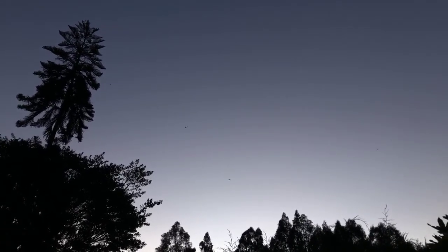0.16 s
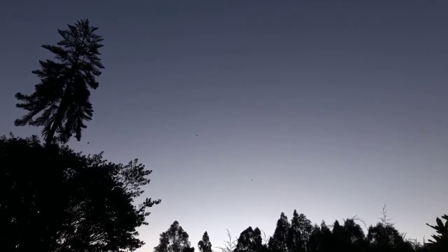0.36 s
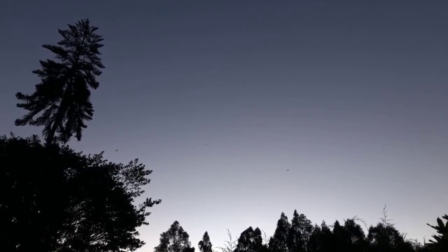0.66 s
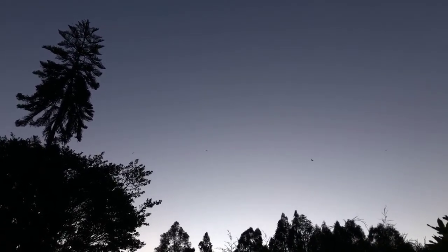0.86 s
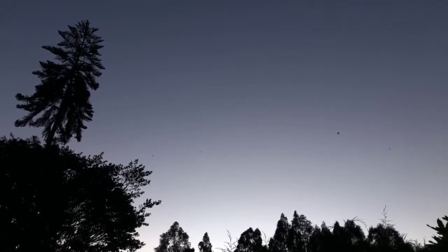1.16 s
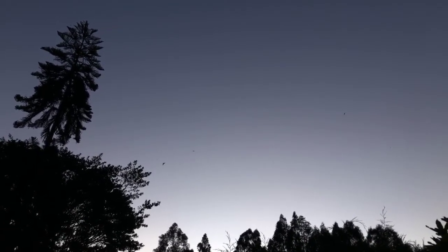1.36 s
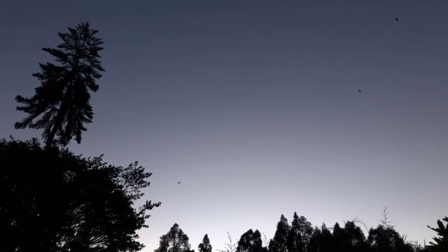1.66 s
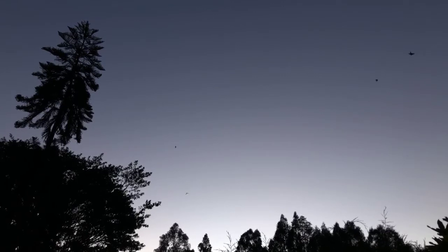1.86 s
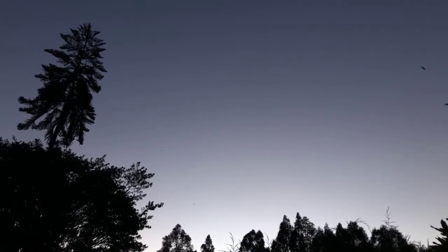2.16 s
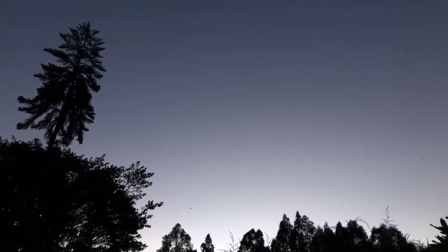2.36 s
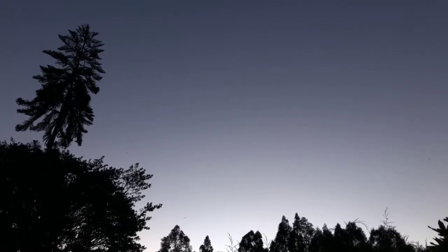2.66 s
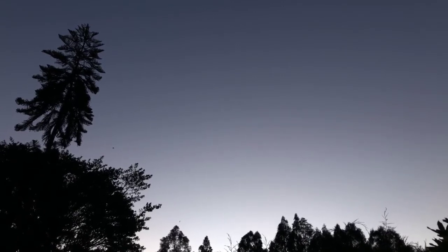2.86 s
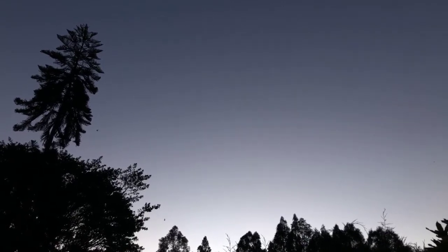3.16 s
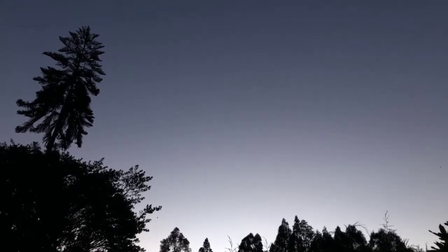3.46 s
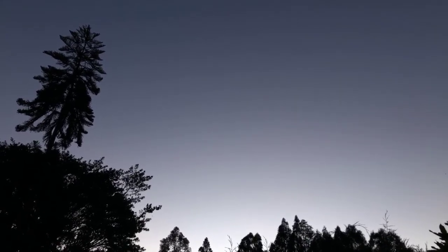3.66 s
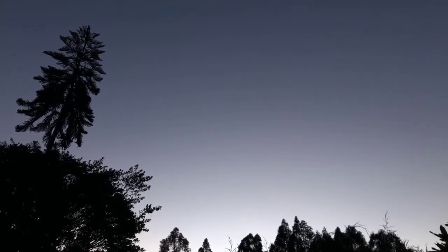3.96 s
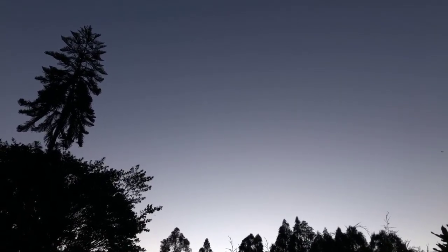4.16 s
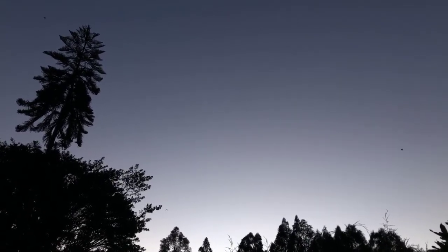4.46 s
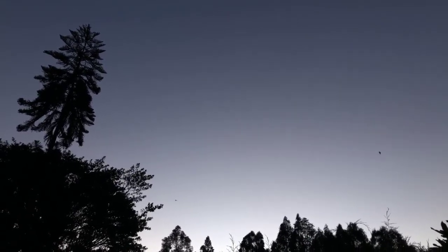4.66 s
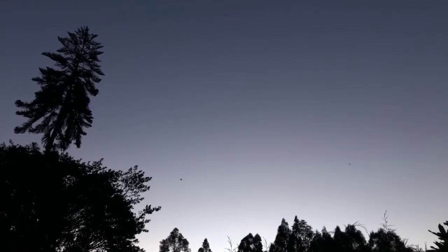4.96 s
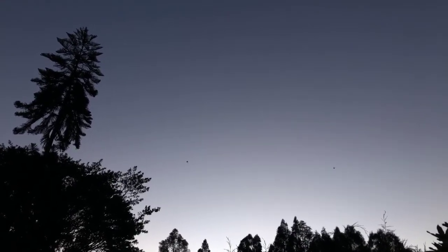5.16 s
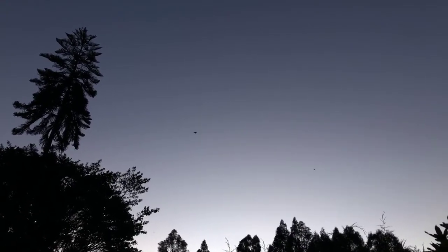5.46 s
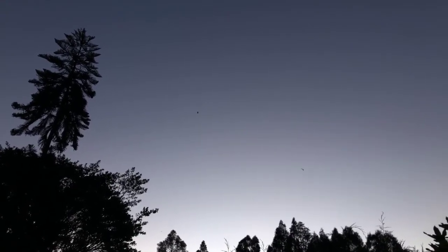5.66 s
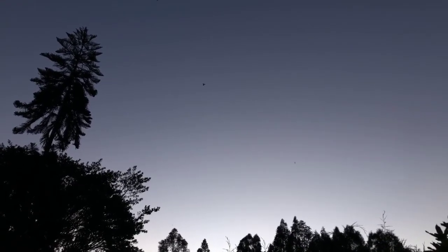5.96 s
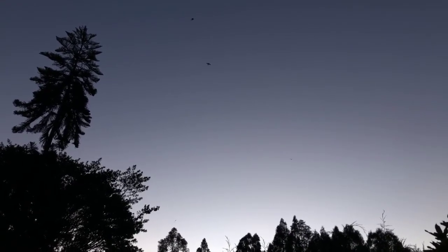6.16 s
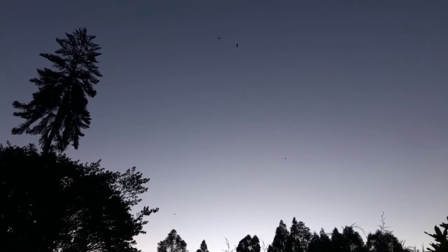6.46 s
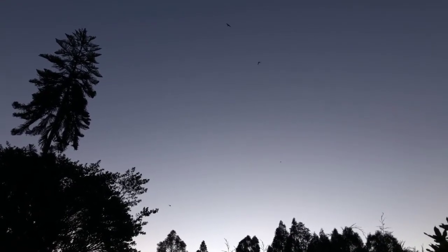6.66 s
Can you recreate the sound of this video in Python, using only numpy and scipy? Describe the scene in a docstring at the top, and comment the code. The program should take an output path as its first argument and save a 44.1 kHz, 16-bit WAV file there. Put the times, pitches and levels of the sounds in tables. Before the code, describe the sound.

A quiet outdoor dusk with a soft, deep rumble like distant traffic, gently swelling around 2 s and continuing throughout. From 0 to 1 s, two faint falling swallow chirps, low double pips, a short far buzzing trill and thin contact calls appear. A slightly clearer thin call comes near 1.2 s, then weak drawn-out chirps and small dry ticks between 1.5 and 2 s. From 2.4 to 3.5 s, hoarse little nasal calls repeat far off among thin peeps. Gliding whistles around 4 to 6 kHz gather from 3.5 s. At 4.4 to 5.75 s comes the bright peak: high squeaks, a strong sinking whistle and rapid downward chirps over distant twitter, with brief hiss and tiny clicks. After 6 s only faint whistles remain, the last sinking near 6.6 s. Very distant hoots recur; trees and ground softly reflect the calls.

```python
"""Swallows overhead at dusk, over a low distant rumble of filtered noise with a high hiss that comes and goes.
First come faint swept-sine chirps, far pips, a buzzing trill of resonant noise and dry noise-burst ticks;
then hoarse nasal calls, gliding whistles and a dense run of falling chirps amid a far twitter.
Late on, more faint whistles follow. Hoots and tiny clicks recur; ground and trees throw the calls back."""
import sys
import numpy as np
from scipy import signal
from scipy.fft import rfft, irfft
from scipy.io import wavfile
from scipy.ndimage import uniform_filter1d

SR = 44100
rng = np.random.default_rng(int(sys.argv[2]) if len(sys.argv) > 2 else 0)


def persist_wave(psi):
    """Save psi, clipped to +-1, as 16-bit WAV."""
    counts = np.round(np.clip(psi, -1, 1) * 32767).astype(np.int16)
    wavfile.write(sys.argv[1], SR, np.atleast_2d(counts).T)


N = 300762
TIME = np.arange(N) / SR

# Note shapes give level_db relative to the level of each event; spectra give relative level_db.
# spectrum of the air and rumble: frequency_hz, level_db
AIR_SPECTRUM = [(22, -23.5), (42, 0.7), (70, -4), (120, -8), (200, -18.5), (330, -26), (580, -30.5),
                (920, -29), (1500, -35.5), (2400, -40), (3100, -40), (4200, -43.5), (6500, -51),
                (15500, -60)]
# swell of the rumble: time_s, change_db
RUMBLE_SWELL = [(0, 0.5), (.8, 0), (1.2, -1), (2.2, 2), (4.6, -1.5), (5.2, 0), (6.82, 1.5)]
# strength of a faint rustle: time_s, level_db
RUSTLE_LEVEL = [(0, -69.5), (1.0, -71.5), (1.8, -65), (2.2, -73.5), (3.2, -77), (5.9, -76), (6.82, -100)]
# spectrum of the rustle: frequency_hz, level_db
RUSTLE_SPECTRUM = [(300, -17), (900, 6.5), (2000, 3), (3000, 1.5), (4200, 0), (6000, -9.5), (9000, -31.5)]
# bell-shaped swells of a high hiss: centre_s, level_db, half_length_s
HISS_SWELLS = [(1.3, -78, .09), (1.7, -80, 0.16), (4.47, -61.5, 0.097), (4.7, -67.5, .09),
               (5.45, -76, 0.21), (6.52, -71.5, 0.11)]
# spectrum of the hiss: frequency_hz, level_db
HISS_SPECTRUM = [(500, -20), (1800, 1.5), (4000, -0.5), (7000, -6.5), (10000, -5), (12500, -9),
                 (15500, -22)]
# spectrum scattered back by the trees: frequency_hz, level_db
TREE_SPECTRUM = [(1000, -8), (2200, 0), (2900, 5.5), (4300, -4), (5200, 3.5), (6500, 2), (9000, -26.5)]

# strength of the far flock, on top of its chirps: time_s, level_db
FLOCK_LEVEL = [(0, -73), (3.2, -76), (4.25, -80), (4.5, -68), (4.9, -65), (5.5, -68), (6.1, -85),
               (6.82, -88)]
# very distant hoots, smeared by the trees: centre_s, level_db, half_length_s
HOOT_SWELLS = [(.62, -71, .08), (1.83, -74, 0.047), (2.8, -74.5, 0.054), (3.95, -67.5, .12),
               (4.71, -70.5, 0.087), (5.78, -70.5, 0.086)]
# a far buzzing trill that swells and breaks off: time_s, level_db
BUZZ_LEVEL = [(.49, -110), (.53, -77.5), (.77, -66), (.88, -76), (.92, -110)]
# resonances of the trill: frequency_hz, width_hz, level_db
BUZZ_RESONANCES = [(3200, 2400, -2), (5560, 600, -3)]
# shape of a far nasal call: time_s, pitch_hz, level_db
NASAL_SHAPE = [(0, 1043, -8), (.012, 1069, -1.5), (.03, 1010, -1.5), (.046, 922, -9)]
# nasal calls: start_s, level_db
NASAL_CALLS = [(2.4, -72.5), (2.68, -66), (2.957, -69), (3.248, -67), (3.509, -66.5)]
# shape of a far bird's low pip: time_s, pitch_hz, level_db
PIP_SHAPE = [(0, 2080, 3), (.01, 1990, 1), (.026, 1780, 0)]
# pairs of pips: start_s, first_level_db
PIP_PAIRS = [(0.278, -68), (.513, -65.5), (0.739, -68)]
PIP_GAP_S, SECOND_PIP_DB = 0.033, -3
# shape of a short thin contact call: time_s, pitch_hz, level_db
CONTACT_SHAPE = [(0, 6650, -3), (.008, 5900, 1), (.017, 4990, -6.5), (.022, 4400, -24), (.036, 3850, -3)]
# contact calls: start_s, level_db, time_stretch (ratio)
CONTACT_CALLS = [(.702, -73, 1.0), (.86, -67, 1.3), (1.182, -61, 1.2), (2.558, -72, 1.0), (2.74, -76, 1.0),
                 (2.828, -67, .8), (2.92, -78, 1.0), (3.047, -70.5, 1.1), (3.1, -73, 1.0), (3.227, -71, .7)]

# tiny sharp clicks: time_s, level_db (peak of the impulse before its filter)
CLICK_EVENTS = [(1.008, -55), (1.035, -53), (2.405, -48), (2.754, -49), (4.482, -36), (5.052, -45),
                (5.225, -50), (5.518, -43), (5.99, -52)]
# small dry ticks: start_s, level_db
TICK_EVENTS = [(1.489, -49), (1.496, -49.5), (1.679, -53), (1.71, -56), (1.728, -65), (2.011, -53),
               (2.018, -56)]
# spectrum of a tick: frequency_hz, level_db
TICK_SPECTRUM = [(300, -27), (1000, 2), (1800, 0.5), (2600, -8), (3800, -3), (6000, -24), (14000, -36)]

# gliding whistles: start_s, rise_s, fall_s, crest_hz, climb_octaves_per_s, sink_octaves_per_s,
# slip_after_crest_s, slip_octaves, loudest_at (share of the length), level_db
GLIDING_WHISTLES = [(0.51, 0.014, 0.236, 4636.0, 0.0, 0.14, 0.0, 0.0, 0.45, -71.7),
                    (0.53, 0.176, 0.074, 4100.0, 0.5, 1.2, 0.0, 0.0, 0.3, -71.0),
                    (0.92, 0.052, 0.448, 4995.0, 2.0, 2.0, 0.062, 0.09, 0.3, -68.5),
                    (2.08, 0.013, 0.237, 4544.0, 0.0, 2.29, 0.0, 0.0, 0.9, -74.7),
                    (3.505, 0.12, 0.01, 4296.0, 0.5, 0.5, 0.0, 0.0, 0.9, -60.5),
                    (3.555, 0.027, 0.04, 5130.0, 2.2, 4.0, 0.017, 0.26, 0.6, -60.0),
                    (3.73, 0.145, 0.045, 4813.0, 0.3, 0.8, 0.0, 0.0, 0.65, -57.2),
                    (3.91, 0.05, 0.325, 4375.0, 0.0, 1.62, 0.0, 0.0, 0.65, -56.0),
                    (3.77, 0.095, 0.36, 4663.0, 0.4, 2.87, 0.0, 0.0, 0.12, -66.5),
                    (3.973, 0.026, 0.026, 5060.0, 5.2, 1.01, 0.0, 0.0, 0.55, -63.7),
                    (3.976, 0.007, 0.607, 6240.0, 0.0, 1.94, 0.118, 0.13, 0.55, -53.5),
                    (4.055, 0.005, 0.07, 4432.0, 0.0, 1.94, 0.0, 0.0, 0.7, -51.1),
                    (4.16, 0.04, 0.075, 5191.0, 4.1, 2.55, 0.0, 0.0, 0.35, -56.9),
                    (4.22, 0.025, 0.125, 6602.0, 8.0, 0.34, 0.0, 0.0, 0.1, -71.9),
                    (4.447, 0.034, 0.411, 5319.0, 5.1, 1.77, 0.018, 0.17, 0.55, -46.3),
                    (4.845, 0.011, 0.184, 3563.0, 0.0, 2.54, 0.0, 0.0, 0.9, -57.4),
                    (6.075, 0.125, 0.05, 4244.0, 0.7, 0.79, 0.0, 0.0, 0.6, -67.8),
                    (6.33, 0.085, 0.125, 4620, 0.4, 0.6, 0, 0, 0.28, -68),
                    (6.535, 0.005, 0.31, 4450, 0, 1.58, 0, 0, 0.78, -60)]
CREST_S, SLIP_S = 0.03, 0.011  # how long the pitch takes to turn over, and to slip down
WHISTLE_ONSET_DB, WHISTLE_PEAK_DB, WHISTLE_END_DB = -9, 0.5, -7  # relative to the level of its row
# shape of the high squeak that opens a series: time_s, pitch_hz, level_db
SQUEAK_SHAPE = [(-.03, 8200, -19), (-.016, 8060, -8), (0, 8240, -5.5), (.009, 7750, -2), (.016, 7050, -7)]
# squeaks: time_s, level_db
SQUEAK_EVENTS = [(4.414, -52.5), (4.655, -58)]
# shape of another bird's soft slur, just ahead of full chirps: time_s, pitch_hz, level_db
SLUR_SHAPE = [(-.026, 6500, -6), (-.012, 5000, -18), (0, 4100, 0), (.018, 3500, -7), (.034, 2960, -3),
              (.054, 2520, -2)]
# slurs: time_s, level_db, time_stretch (ratio)
SLUR_EVENTS = [(5.361, -59, 0.73), (5.515, -59.5, 1.11), (5.707, -59, 0.95)]
# shape of a steep chirp with a U-shaped opening hook: time_from_knee_s, pitch_hz, level_db
STEEP_SHAPE = [(-.0165, 7500, -15), (-.012, 5950, 1), (-.0075, 7500, -16), (-.0055, 4950, -1),
               (-.002, 5280, 5), (.004, 4450, -9), (.023, 3720, 6), (.032, 3200, -3), (.05, 2520, -4),
               (.067, 2080, -17)]
# steep chirps: knee_s, level_db, time_stretch (ratio)
STEEP_CHIRPS = [(4.389, -61, 1.14), (4.672, -52, 1.17), (4.825, -50.5, 1.11), (4.983, -51.5, 1.07),
                (5.136, -53, 1.11)]
# shape of a full chirp: time_from_knee_s, pitch_hz, level_db
FULL_SHAPE = [(-.019, 7500, -27), (-.011, 6150, -14), (-.002, 4900, -14), (.005, 4560, -1),
              (.019, 4150, -2), (.029, 3800, 3.5), (.046, 3230, -1), (.066, 2720, -9), (.084, 2480, -21)]
# full chirps: knee_s, level_db, time_stretch (ratio)
FULL_CHIRPS = [(0.062, -58.5, 1.06), (.2, -84, .9), (.251, -59, 0.98), (.38, -81, 1.1), (.825, -73, .9),
               (1.418, -79, 1.2), (1.553, -67.5, 1.47), (1.77, -69, 1.7), (1.987, -68.5, 1.47),
               (4.447, -51.5, 1.16), (4.686, -50.5, 1.1), (5.008, -47, 1.23), (5.195, -44.5, 1.11),
               (5.298, -62.5, 0.84), (5.374, -45.5, 0.94), (5.546, -47.5, 1.05), (5.727, -52, 1),
               (5.87, -84, 0.94)]

DISTANT_BELOW_DB, DULLING_DB_PER_OCTAVE = -59, 1.95  # fainter calls lose treble, so much for each dB


def from_db(db):
    """Amplitude ratio: 20 dB make a factor of ten."""
    return 10 ** (np.asarray(db) / 20)


def rms_one(x):
    """Normalisation to unit mean power."""
    return x / np.sqrt(np.mean(x ** 2) + 1e-20)


def level(rows):
    """Amplitude envelope, linear in decibels between (time_s, level_db) rows."""
    return from_db(np.interp(TIME, *np.transpose(rows)))


def swells(rows):
    """Gaussian amplitude envelopes, summed over (centre_s, level_db, half_length_s) rows."""
    return sum(from_db(db) * np.exp(-((TIME - s) / half) ** 2 / 2) for s, db, half in rows)


def coloured(points, size=N):
    """Spectral shaping: white noise weighted along (frequency_hz, level_db) points, rms 1."""
    hz, db = np.transpose(points)
    bins = np.maximum(np.arange(size // 2 + 1) * SR / size, 1)
    gain = from_db(np.interp(np.log(bins), np.log(hz), db))
    below = np.minimum(bins / hz[0], 1) ** 2
    spectrum = rfft(rng.standard_normal(size)) * gain * below
    return rms_one(irfft(spectrum, size))


def narrow(hz, width_hz):
    """Resonance: noise passed twice through one damped resonator is a blurred tone, rms 1."""
    radius = np.exp(-np.pi * width_hz / SR)
    b = [1, 0.0037, -1]
    a = [1, -2 * radius * np.cos(2 * np.pi * hz / SR), radius * radius]
    once = signal.lfilter(b, a, rng.standard_normal(N))
    return rms_one(signal.lfilter(b, a, once))


def drift(t, rate):
    """Random modulation: straight lines between `rate` random values a second."""
    knots = rng.standard_normal(1024)
    return np.interp((t - t[0]) * rate, np.arange(len(knots)), knots)


def add(out, s, sound):
    """Superposition: a sound is summed in from time s on."""
    start = max(int(s * SR), 0)
    out[start:start + len(sound)] += sound[:max(N - start, 0)]


def sing(rows, overtones_db, waver, flutter_db, edge_s=0.0051, far_flutter=0.081, steady_db=-51):
    """Frequency modulation: the syrinx's harmonics follow (time_s, pitch_hz, level_db) rows, unsteadily."""
    s, hz, db = np.transpose(rows)
    t = np.arange(s[0] - edge_s, s[-1] + edge_s, 1 / SR)
    pitch = uniform_filter1d(np.interp(t, s, hz), size=60) * (1 + waver * drift(t, rate=440))
    phase = 2 * np.pi * np.cumsum(pitch) / SR
    from_edge_s = np.minimum(t - t[0], t[-1] - t)
    fade = np.sin(np.pi / 2 * np.clip(from_edge_s / (2 * edge_s), 0, 1)) ** 2
    # faint calls have come a long way through moving air: they twinkle more and are duller
    twinkle_db = far_flutter * max(steady_db - db.max(), 0)
    faintness_db = max(DISTANT_BELOW_DB - db.max(), 0)
    dull_db = DULLING_DB_PER_OCTAVE * faintness_db * np.log2(pitch / pitch.mean())
    unsteady_db = flutter_db * drift(t, rate=200) + twinkle_db * drift(t, rate=45)
    gain = fade * from_db(np.interp(t, s, db) - dull_db + unsteady_db)
    voice = sum(from_db(d) * np.sin((k + 1) * phase) for k, d in enumerate(overtones_db))
    return t[0], np.sqrt(2) * gain * voice


def series(shape, events, overtones_db, waver, flutter_db):
    """Repetition: one note shape recurs with its own strength and, if given, its own time stretch."""
    out = np.zeros(N)
    for s, db, *pace in events:
        stretch = pace[0] if pace else 1
        rows = np.array(shape) * [stretch, 1, 1] + [s, 0, db]
        add(out, *sing(rows, overtones_db, waver, flutter_db))
    return out


def background(air_db=-51, drone_hz=66, drone_width_hz=22, drone_db=-59, swell_below_hz=130):
    """Broadband noise: distant traffic rumbles with a blurred drone; rustle and hiss come and go."""
    air = from_db(air_db) * coloured(AIR_SPECTRUM)
    air += from_db(drone_db) * narrow(drone_hz, drone_width_hz)
    lowpass = signal.butter(2, swell_below_hz, fs=SR, output="sos")
    bass = signal.sosfiltfilt(lowpass, air)
    air = air + bass * (level(RUMBLE_SWELL) - 1)
    rustle = level(RUSTLE_LEVEL) * coloured(RUSTLE_SPECTRUM)
    hiss = swells(HISS_SWELLS) * coloured(HISS_SPECTRUM)
    return air + rustle + hiss


def outdoors(x, ground_db, trees_db, echo_db, t60, ground_s=0.006, build_s=0.01, count=10):
    """Reflection and scattering: a ground bounce, echoes from single trees, a diffuse foliage tail."""
    t = TIME[:2 * SR]
    decay = from_db(-60 * t / t60) * (1 - np.exp(-t / build_s))
    tail = coloured(TREE_SPECTRUM, size=len(t)) * decay
    tail /= np.sqrt(np.sum(tail ** 2))  # unit energy
    scattered = signal.fftconvolve(x, tail)[:N]
    bounce = np.interp(TIME - ground_s, TIME, x, left=0)
    echoes = np.zeros(N)
    for lag in rng.uniform(0.046, 0.22, count):
        echoes += np.interp(TIME - lag, TIME, x, left=0) * from_db(-60 * lag / t60)
    return x + from_db(ground_db) * bounce + from_db(trees_db) * scattered + from_db(echo_db) * echoes


def flock(count=80):
    """Random superposition: far swallows chirp at varied pitch and pace, broken up by the long path."""
    out = np.zeros(N)
    for k, (when, pace, pitch, strength) in enumerate(rng.random((count, 4))):
        knee_s = (k + when) / count * N / SR
        scale = [0.67 + 0.5 * pace, 0.9 + 0.16 * pitch, 1]
        rows = np.array(FULL_SHAPE) * scale + [knee_s, 0, -6 * strength]
        add(out, *sing(rows, [0], waver=0.014, flutter_db=4.5))
    return out * level(FLOCK_LEVEL)


def far_birds(rasp_db=-3, rasp_hz=2700, rasp_width_hz=1200):
    """Harmonics and resonant noise: hoots beyond the trees, a trill, nasal calls, pips, contact calls."""
    hoots = swells(HOOT_SWELLS) * narrow(1270, 120)
    buzz = rms_one(sum(from_db(db) * narrow(hz, width) for hz, width, db in BUZZ_RESONANCES))
    buzz *= level(BUZZ_LEVEL) * from_db(4.5 * drift(TIME, rate=37))
    nasal = series(NASAL_SHAPE, NASAL_CALLS, [-18, -1, -1, -14], waver=0.025, flutter_db=7.5)
    voice_envelope = uniform_filter1d(np.abs(nasal), size=130)
    rasp = from_db(rasp_db) * voice_envelope * narrow(rasp_hz, rasp_width_hz)  # noise follows the voice
    pairs = []
    for s, db in PIP_PAIRS:
        pairs += [(s, db), (s + PIP_GAP_S, db + SECOND_PIP_DB)]
    pips = series(PIP_SHAPE, pairs, [0, -14], waver=0.015, flutter_db=3.0)
    contacts = series(CONTACT_SHAPE, CONTACT_CALLS, [0], waver=0.025, flutter_db=2.5)
    return hoots + buzz + nasal + rasp + pips + contacts


def clicks(low_hz=5000, high_hz=13000):
    """Impulse response: single impulses ring a band-pass filter that leaves mostly treble."""
    out = np.zeros(N)
    for s, db in CLICK_EVENTS:
        add(out, s, from_db([db]))
    band = signal.butter(2, [low_hz, high_hz], "band", fs=SR, output="sos")
    return signal.sosfilt(band, out + 1e-18)


def ticks(decay_s=0.0037):
    """Exponential decay: each tick is a noise burst that dies within milliseconds."""
    out, t = np.zeros(N), TIME[:2048]
    for s, db in TICK_EVENTS:
        burst = coloured(TICK_SPECTRUM, size=len(t)) * np.exp(-t / decay_s)
        add(out, s, from_db(db) * burst)
    return out


def whistles(fading_db=2.5, size=64):
    """Pitch glide: a tone climbs or holds to a rounded crest, may slip down, then sinks; it swells once."""
    out = np.zeros(N)
    for start, rise, fall, crest_hz, climb, sink, slip_at, slip, loudest, db in GLIDING_WHISTLES:
        t = np.linspace(-rise, fall, size)  # from the crest
        octaves_down = np.where(t < 0, climb, sink) * (np.hypot(t, CREST_S) - CREST_S)
        octaves_down += slip * (1 + np.tanh((t - slip_at) / SLIP_S)) / 2
        swell_levels = [WHISTLE_ONSET_DB, WHISTLE_PEAK_DB, WHISTLE_END_DB]
        swell_db = np.interp(np.linspace(0, 1, size), [0, np.clip(loudest, 0, 1), 1], swell_levels)
        level_db = db + swell_db + fading_db * drift(t, rate=33.5)
        rows = np.transpose([start + rise + t, crest_hz * 2 ** -octaves_down, level_db])
        add(out, *sing(rows, [0], waver=0.0037, flutter_db=2.3, edge_s=0.008))
    return out


def swallows():
    """Swept pure tones: long glides, high squeaks, soft slurs and quick falling chirps."""
    out = whistles()
    out += series(SQUEAK_SHAPE, SQUEAK_EVENTS, [0], waver=0.002, flutter_db=1.5)
    out += series(SLUR_SHAPE, SLUR_EVENTS, [0], waver=0.008, flutter_db=1.0)
    out += series(STEEP_SHAPE, STEEP_CHIRPS, [0], waver=0.01, flutter_db=4.3)
    out += series(FULL_SHAPE, FULL_CHIRPS, [0], waver=0.0054, flutter_db=2.1)
    return out


def scene():
    """Superposition: far birds have stronger reflections than near ones; clicks and background have none."""
    far = outdoors(flock() + far_birds(), ground_db=-9.5, trees_db=-12.52, echo_db=-14, t60=0.52)
    near = outdoors(ticks() + swallows(), ground_db=-14.5, trees_db=-16.52, echo_db=-20.5, t60=0.91)
    return (background() + from_db(0.5) * far + clicks() + near)[None, :]


def record(dry, cutoff_hz=15700):
    """Low-pass filtering: an elliptic filter cuts the top steeply."""
    lowpass = signal.ellip(10, 0.1, 70, cutoff_hz, fs=SR, output="sos")
    return signal.sosfilt(lowpass, dry)


dry = scene()
out = record(dry)
persist_wave(out)
```